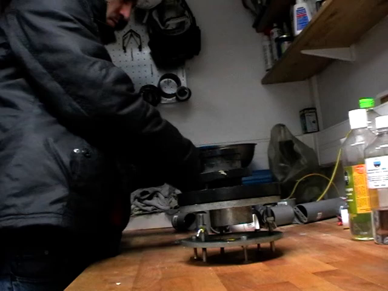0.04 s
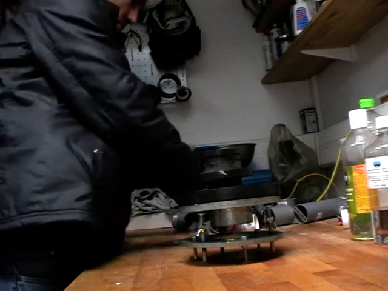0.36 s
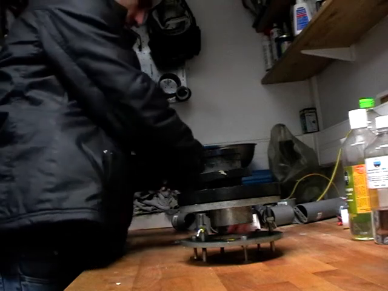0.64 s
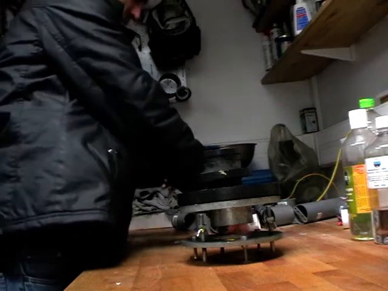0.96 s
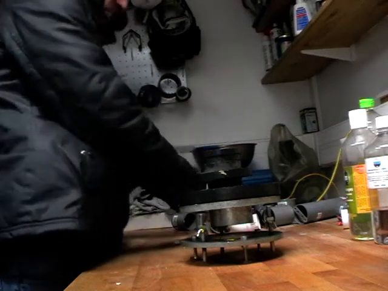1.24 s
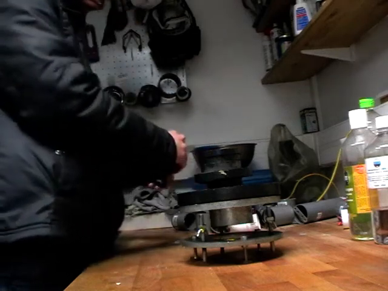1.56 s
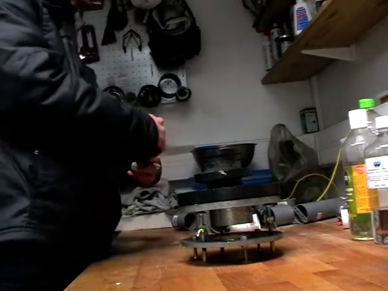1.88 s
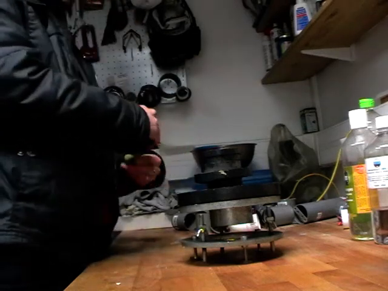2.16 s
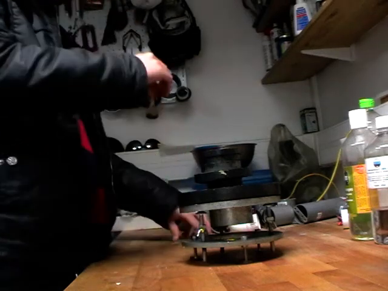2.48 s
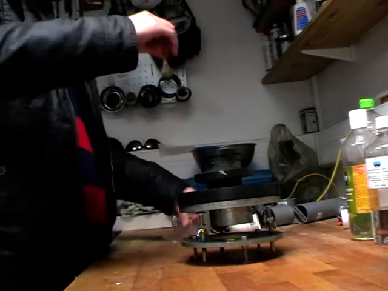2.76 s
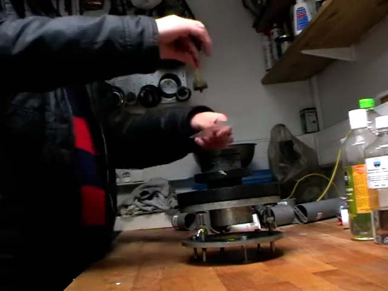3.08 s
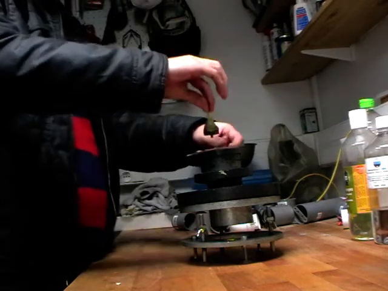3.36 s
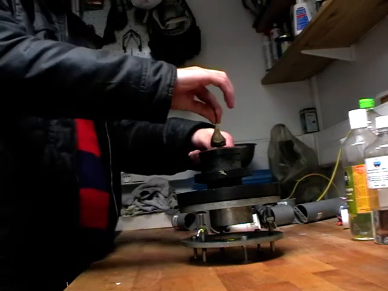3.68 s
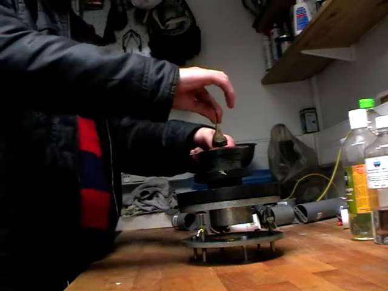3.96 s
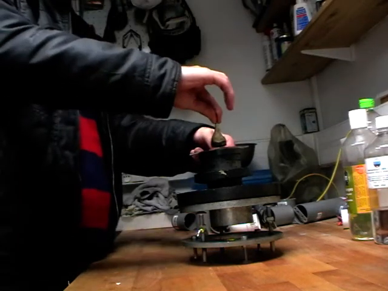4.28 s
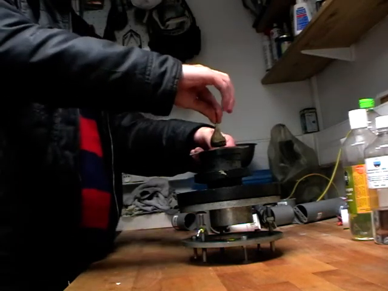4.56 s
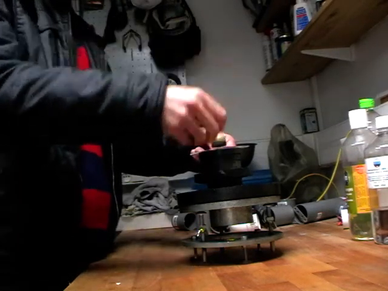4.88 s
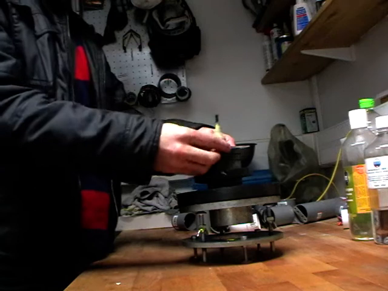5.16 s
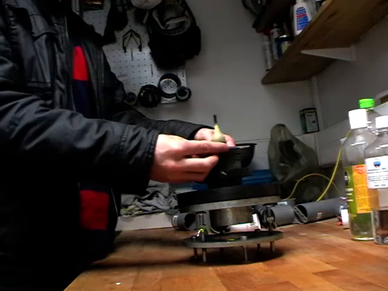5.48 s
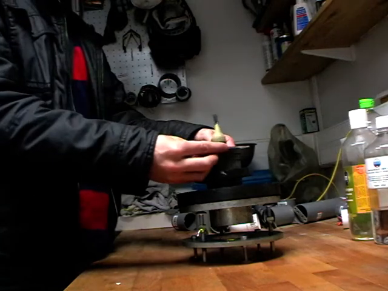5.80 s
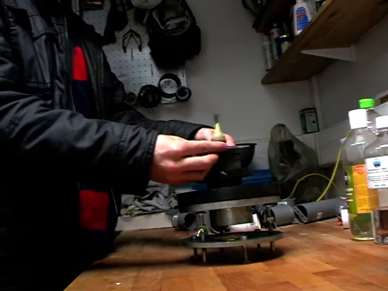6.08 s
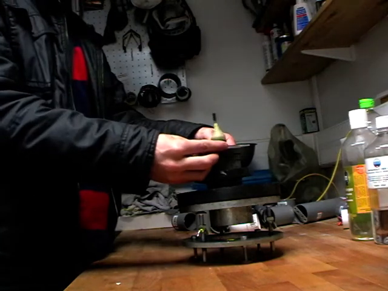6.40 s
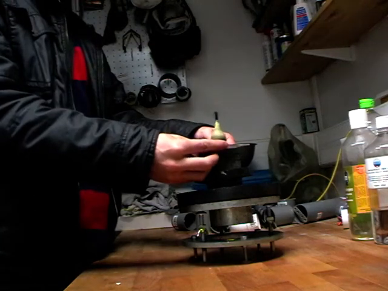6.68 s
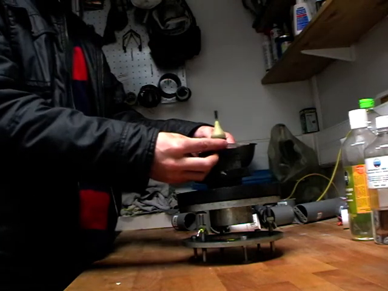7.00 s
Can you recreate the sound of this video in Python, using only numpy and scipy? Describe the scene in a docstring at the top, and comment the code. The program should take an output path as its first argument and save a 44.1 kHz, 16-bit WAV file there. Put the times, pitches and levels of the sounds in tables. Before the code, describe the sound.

Sleeve rustles and soft workbench bumps, a few sharp clacks, then the thin, steady whir of a spinning top on a plate.

```python
"""A small workshop: someone in a nylon jacket starts a magnetic spinning top on a workbench.
Sleeves swish over faint room air as threads slip; soft bumps boom in the bench top.
A lifter plate is scraped up in stick-slip strokes and clacks down over the magnet base.
The top is flicked on to the plate, hops and whirs: its tip rattles the plate's modes, pulsing once a turn,
with a few taps and squeals. As the plate is lifted, other modes grow and the bench rumble fades."""
import sys
import numpy as np
from scipy import signal
from scipy.io import wavfile

SR = 44100
rng = np.random.default_rng(int(sys.argv[2]) if len(sys.argv) > 2 else 0)


def wav_out(sig):
    """Save sig, one row per channel (or a flat mono array), as 16-bit PCM at SR to the path in sys.argv[1]."""
    wavfile.write(sys.argv[1], SR, np.round(np.clip(np.atleast_2d(sig).T, -1, 1) * 32767).astype(np.int16))


N = 310464
TIME = np.arange(N) / SR
HALF_OCTAVES_HZ = 22 * 2 ** (np.arange(20) / 2)


def from_db(db):
    """Decibels to gain."""
    return 10 ** (np.asarray(db) / 20)


def unit_rms(x):
    """Scale to rms 1."""
    return x / np.sqrt(np.mean(x ** 2) + 1e-20)


def at_hz(curve, hz):
    """Read a curve on a log-frequency axis."""
    points_hz, values = np.transpose(curve)
    return np.interp(np.log(hz), np.log(points_hz), values)


def butter(x, hz, kind, order=2):
    """Butterworth filter."""
    sos = signal.butter(order, np.clip(hz, 10, .45 * SR), kind, fs=SR, output="sos")
    return signal.sosfilt(sos, x)


def pan(x, left_db):
    """Stereo placement; left_db is left minus right."""
    return x * from_db(np.array([[left_db], [-left_db]]) / 2)


def add(out, start_s, sound):
    """Mix a sound in at start_s."""
    at = int(start_s * SR)
    out[..., at:at + sound.shape[-1]] += sound[..., :N - at]


def swell(t, rise_s, fall_s):
    """Lopsided Gaussian peaking at t = 0."""
    return np.exp(-.5 * (t / np.where(t < 0, rise_s, fall_s)) ** 2)


def step(at_s, width_s):
    """Smooth step from 0 to 1."""
    return .5 + .5 * np.tanh((TIME - at_s) / width_s)


def drift(rate_hz):
    """Slow random wander, rms 1."""
    hop, warmup = 40, 2000
    pole = np.exp(-2 * np.pi * rate_hz * hop / SR)
    noise = rng.standard_normal(N // hop + warmup + 2)
    slow = signal.lfilter([1], [1, -2 * pole, pole * pole], noise)[warmup:]
    return np.interp(np.arange(N) / hop, np.arange(len(slow)), unit_rms(slow))


def grains(per_s, spread_db):
    """Friction: tiny slips of uneven size at random moments, rms 1."""
    sizes = from_db(spread_db * np.minimum(rng.exponential(1, N), 4)) * rng.choice([-1, 1], N)
    return unit_rms(sizes * (rng.random(N) < per_s / SR))


def coloured(draw, spectrum, correlation, balance, flicker_db):
    """Shape a random source in flickering half-octave stereo bands, rms 1."""
    sources = [(draw(), draw()) for _ in range(2)]
    out = 0
    for k, band in enumerate(zip(HALF_OCTAVES_HZ, HALF_OCTAVES_HZ[1:])):
        hz = np.sqrt(band[0] * band[1])
        if hz < spectrum[0][0]:
            continue
        mid, side = butter(sources[k % 2], band, "band", order=3)
        alike = np.clip(at_hz(correlation, hz), 0, .995)
        pair = np.sqrt(1 + alike) * mid + np.sqrt(1 - alike) * side * [[1], [-1]]
        gain = from_db(at_hz(spectrum, hz) + flicker_db * drift(rate_hz=8.6))
        out = out + gain * pan(pair, at_hz(balance, hz))
    return unit_rms(out)


def resonate(force, modes, ring=1):
    """Parallel modes of alternating sign; ring divides their widths."""
    out = 0
    for k, (hz, width_hz, db) in enumerate(modes):
        r = np.exp(-np.pi * width_hz / ring / SR)
        poles = [1, -2 * r * np.cos(2 * np.pi * hz / SR), r * r]
        gain = (-1) ** k * from_db(db) * (1 - r * r) / 2
        out = out + gain * signal.lfilter([1, 0, -1], poles, force)
    return out


def touched(modes, spread_db):
    """Each contact spot favours other modes."""
    return np.array(modes) + np.outer(rng.normal(0, spread_db, len(modes)), [0, 0, 1])


def blow(modes, bands_hz, levels_db, attack_s, chatter_s, chatter, ring):
    """A contact and its dying micro-bounces ring a body; levels_db is each band's rms over attack_s."""
    t = TIME[:SR // 2]
    bounces = rng.standard_normal(len(t)) * np.exp(-t / chatter_s)
    force = chatter * unit_rms(bounces) / np.sqrt(len(t))
    force[0] += 1
    body = resonate(force + 1e-18, modes, ring)
    parts = [butter(body, band, "band", order=3) for band in bands_hz]
    return sum(from_db(db) * part / np.std(part[t < attack_s]) for part, db in zip(parts, levels_db))


def workshop(x, wet_db, width, gap_s=.0036):
    """Add the dense reflections of a small cluttered room."""
    # reverberation: f/Hz, T60/s
    t60 = [(100, .2), (1000, .21), (3000, .23), (7000, .21), (14000, .16)]
    t = TIME[:SR // 2]
    tail = 0
    for band in zip(HALF_OCTAVES_HZ, HALF_OCTAVES_HZ[1:]):
        decay = from_db(-60 * t / at_hz(t60, band[1]))
        tail = tail + butter(rng.standard_normal((2, len(t))), band, "band") * decay
    mid, side = unit_rms(tail * (t > gap_s)) / np.sqrt(len(t))
    echoes = mid + width * side * [[1], [-1]]
    return x + from_db(wet_db) * signal.fftconvolve(x, echoes, axes=1)[:, :N]


def room_air():
    """Faint low rush of the still room."""
    # f/Hz, relative density/dB
    spectrum = [(15, -51), (25, -38.5), (82, -14), (161, -14.5), (190, -13.5), (256, -33), (285, -18.5),
                (335, -2.5), (439, -23), (545, -28.5), (754, -24), (840, -28), (3820, -36), (6000, -37.5),
                (16000, -52)]
    # f/Hz, left-right correlation
    correlation = [(60, .07), (180, 0), (550, 0), (1650, 0), (4970, .46), (15000, .42)]
    # f/Hz, left minus right/dB
    balance = [(60, -7.5), (180, -1), (550, -1), (1650, 1), (4970, -0.5), (15000, 0.5)]
    rush = coloured(lambda: rng.standard_normal(N), spectrum, correlation, balance, flicker_db=2.5)
    return from_db(-56) * rush


def jacket():
    """Slipping nylon threads swish; the duller folding of the cloth grows less with speed."""
    # sleeve strokes: peak t/s, level/dB, rise/s, fall/s
    strokes = [(0.1, -49.5, .06, 0.11), (0.27, -44, 0.0099, 0.025), (0.342, -55.5, 0.01, 0.032),
               (0.66, -50, 0.079, .04), (0.855, -54, 0.049, 0.037), (1.03, -44, 0.042, 0.084),
               (1.165, -49, .03, 0.057), (1.452, -42, 0.047, 0.1), (1.72, -49.5, 0.058, 0.1),
               (1.98, -58.5, 0.22, 0.24), (2.3, -55, 0.07, 0.069), (2.5, -60.5, 0.069, 0.14),
               (3.082, -45.5, 0.064, 0.084), (4.71, -57, .03, 0.025), (4.93, -54, 0.11, 0.062),
               (5.178, -52.5, 0.012, .014), (5.26, -64.5, .02, 0.023)]
    # spectra: f/Hz, relative density/dB
    nylon_spectrum = [(1470, -19), (2500, -17.5), (3690, -12), (4340, 4), (5070, 4.5), (6600, 13),
                      (8270, 10), (11800, -14), (14600, -13), (16000, -35)]
    cloth_spectrum = [(120, -38), (200, -5.5), (238, -4), (334, -0.5), (486, 2), (845, -7.5), (1970, -3.5),
                      (3870, -12), (5000, -8.5), (6500, -38), (11000, -120)]
    # f/Hz, left-right correlation
    correlation = [(60, 0.19), (180, 0.79), (550, 0.79), (1650, 0.77), (4970, 1), (15000, 0.83)]
    # f/Hz, left minus right/dB
    balance = [(60, -2), (180, -2), (550, 0), (1650, 5.5), (4970, 0.5), (15000, 0.5)]
    firm_swish_db, firm_fold_db, still_below_db = -44.5, -47, -67
    swish = np.sqrt(sum((from_db(db) * swell(TIME - peak_s, rise_s, fall_s)) ** 2
                        for peak_s, db, rise_s, fall_s in strokes))
    moving = swish / np.hypot(swish, from_db(still_below_db))
    fold = moving * from_db(firm_fold_db) * (swish / from_db(firm_swish_db)) ** .54
    threads = lambda: grains(per_s=14000, spread_db=1.5)
    nylon = coloured(threads, nylon_spectrum, correlation, balance, flicker_db=2.6)
    cloth = coloured(threads, cloth_spectrum, correlation, balance, flicker_db=2.7)
    return swish * nylon + fold * cloth


def bench_bumps():
    """Soft heavy contacts boom in the bench top; some judder unevenly, duller with each rebound."""
    # t/s, boom/dB, rattle/dB, judder length/s, ring time factor
    bumps = [(0.256, -31, -48.5, .01, 1.9), (0.33, -35.5, -55, .01, 1.8), (0.656, -34.5, -60, .075, 0.63),
             (0.928, -52.5, -77, .03, 0.21), (1.145, -33.5, -50, .055, 0.55), (2.403, -51, -74, .01, 0.74),
             (2.459, -52.5, -76, .01, 1.2), (2.517, -53.5, -76, .01, 1), (4.655, -49.5, -74, .045, 0.26),
             (5.09, -59.5, -80, .045, .6), (5.409, -56, -78, .03, 0.97)]
    # bench modes: f/Hz, width at ring=1/Hz, gain/dB
    modes = [(95, 15, -9), (189, 7, 3), (203, 16, -3), (241, 13, -1), (267, 10, 2), (295, 12, 0),
             (350, 45, -8), (420, 45, -12), (485, 35, -6), (560, 35, -5), (620, 40, -6), (700, 50, -12),
             (2000, 1500, -22), (3200, 1200, -24)]
    bands_hz = [(40, 430), (430, 850), (1100, 5000)]   # boom, knock, rattle
    rebound_loss_db = np.array([1.4, 2.3, 2])
    rebound_s, jitter, knock_re_boom_db = .0205, .1174, -4.5
    out = np.zeros(N)
    for start_s, boom_db, rattle_db, judder_s, ring in bumps:
        for k, late_s in enumerate(np.arange(0, judder_s, rebound_s)):
            slip_s = (k > 0) * rebound_s * jitter * rng.standard_normal()
            levels_db = np.array([boom_db, boom_db + knock_re_boom_db, rattle_db]) - k * rebound_loss_db
            bump = blow(modes, bands_hz, levels_db, attack_s=.025, chatter_s=.007, chatter=.9, ring=ring)
            add(out, start_s + late_s + slip_s, bump)
    return workshop(pan(out, left_db=-4), wet_db=-18, width=2.5)


def plate_scrapes():
    """The plate's edge sticks and slips over the wood in short strokes that ring it."""
    # peak t/s, gain/dB, rise/s, fall/s, relative bass/dB
    strokes = [(0.275, -43.5, 0.0044, 0.0099, 13), (2.514, -47, 0.008, 0.021, 16),
               (2.629, -27, .011, 0.018, -7.5), (2.718, -40, 0.0022, .008, 6),
               (2.733, -31.5, .0086, 0.011, 2.5), (2.765, -40.5, 0.011, 0.02, 9),
               (2.793, -27.5, 0.0068, 0.011, -6), (2.809, -30, 0.0055, 0.0082, 1),
               (2.885, -51, 0.011, 0.027, 11)]
    # dragged plate's modes: f/Hz, width at ring=1/Hz, gain/dB
    modes = [(1894, 37, 4), (2088, 13, 5.5), (2300, 30, -4), (2604, 240, -11), (3340, 220, 2),
             (4040, 520, -2.5), (4955, 90, 2), (5380, 44, 3.5), (5970, 39, 5), (5750, 35, 3.5),
             (6460, 220, 4), (7400, 160, -2.5), (7950, 140, -4.5), (9070, 310, -6.5), (12100, 120, -12)]
    # grit: f/Hz, relative density/dB
    spectrum = [(180, -37), (300, 4), (1030, 7), (1210, 7), (2070, 11.5), (4590, -5.5), (5250, -15),
                (9240, -1), (16000, -12)]
    # f/Hz, left-right correlation
    correlation = [(60, 0.31), (240, 0.81), (950, 0.82), (3770, 0.54), (15000, 0.15)]
    # f/Hz, left minus right/dB
    balance = [(60, -4.0), (240, -0.5), (950, 2), (3770, 7.5), (15000, 0)]
    grit = coloured(lambda: grains(per_s=3000, spread_db=5), spectrum, correlation, balance, flicker_db=2)
    catches = grains(per_s=4300, spread_db=1)
    out = np.zeros((2, N))
    for peak_s, db, rise_s, fall_s, bass_db in strokes:
        near = np.abs(TIME - peak_s) < .15
        t = TIME[near] - peak_s
        ringing = unit_rms(resonate(catches[near], touched(modes, spread_db=3), ring=.6))
        slips = from_db(-7) * grit[:, near] + from_db(-1) * pan(ringing, left_db=.8)
        scrape = butter(slips, 1900, "high") - from_db(bass_db) * butter(slips, 770, "low")
        add(out, peak_s + t[0], from_db(db) * swell(t, rise_s, fall_s) * scrape)
    return workshop(out, wet_db=-14.5, width=.12)


def clack(ring_db, thud_db, knock_db, hardness_db, chatter_s):
    """One contact on the plate; a hard one snaps and sizzles above the ring."""
    # plate modes: f/Hz, width at ring=1/Hz, gain/dB
    plate_modes = [(117, 68, -12.5), (328, 500, -12.5), (592, 52, -1.5), (987, 50, 0), (1134, 66, -1.5),
                   (1230, 99, -2.5), (1436, 164, -3.5), (1990, 230, -6.5), (2162, 75, 2.5), (2540, 53, -5),
                   (2736, 244, -0.5), (2934, 200, 3.5), (3830, 280, -15.5), (3780, 170, -15.5),
                   (5010, 206, -7), (5185, 190, -9), (5780, 350, -5.5), (6420, 300, -4.5), (7200, 470, -6),
                   (8430, 1100, -12), (10900, 2400, -23)]
    snap_db = ring_db + hardness_db
    sizzle_db = ring_db - 14.5 + 2.2 * hardness_db
    bands_hz = [(80, 700), (800, 1650), (1800, 4000), (4200, 9000), (9500, 15500)]
    levels_db = [thud_db, knock_db, ring_db, snap_db, sizzle_db]
    modes = touched(plate_modes, spread_db=2)
    return blow(modes, bands_hz, levels_db, attack_s=.0045, chatter_s=chatter_s, chatter=1, ring=.68)


def plate_clacks():
    """The plate knocks on the base; the top lands and hops on the plate."""
    # t/s, ring/dB, thud/dB, knock/dB, hardness/dB
    contacts = [(3.2727, -35, -42, -37, 6), (3.329, -31, -42, -33, 3.5), (3.385, -49.5, -46, -42, 0.5),
                (3.421, -25.5, -38, -29, 1), (3.442, -30.5, -36, -33, -11.5),
                (3.575, -56.5, -73.5, -68.5, 10), (3.6017, -33, -42.5, -31, -7.5),
                (3.627, -14.5, -35, -19, -4), (3.6404, -29, -44, -31.5, -0.5),
                (3.6805, -19.5, -32, -38.5, -14.5), (3.6844, -26, -31.5, -38, -4),
                (4.6204, -45, -51.5, -46, 9), (4.6323, -25.5, -36.5, -34, -8)]
    # taps of the tip: t/s, ring/dB
    taps = [(4.312, -64), (4.68, -48), (4.719, -46), (4.801, -47.5), (5.875, -50), (6.31, -47.5),
            (6.514, -48), (6.691, -52.5), (6.871, -51.5)]
    out = np.zeros(N)
    for start_s, ring_db, thud_db, knock_db, hardness_db in contacts:
        chatter_s = .0089 * 2 ** ((-29 - ring_db) / 20)   # firmer blows settle sooner
        add(out, start_s, clack(ring_db, thud_db, knock_db, hardness_db, chatter_s))
    for start_s, db in taps:
        add(out, start_s, clack(db, thud_db=db - 23, knock_db=db - 3, hardness_db=-10, chatter_s=.0052))
    return workshop(pan(out, left_db=3), wet_db=-15, width=.39)


def tip_squeals():
    """The tip's stick-slip locks briefly on to one plate mode."""
    # peak t/s, f/Hz, peak level/dB, Gaussian sigma/s
    squeals = [(5.413, 2870, -49.5, 0.0073), (5.432, 3150, -37, 0.00078), (5.439, 3150, -44, 0.0018),
               (5.496, 2930, -46, .002), (5.517, 2845, -41.5, 0.004), (5.54, 2956, -36.5, 0.0015),
               (5.56, 2900, -50, 0.0037)]
    wander_hz = 90 * drift(rate_hz=164)
    wander_rad = 2 * np.pi * np.cumsum(wander_hz) / SR
    out = 0
    for peak_s, hz, db, sigma_s in squeals:
        envelope = from_db(db) * swell(TIME - peak_s, sigma_s, sigma_s)
        out = out + envelope * np.sin(2 * np.pi * hz * TIME + wander_rad)
    return out


def whir_gain(levels_db, lift, release_s=4.64, settle_s=.38):
    """Gain of one part of the whir: starts at release, settles, shifts with the lift."""
    down_db, up_db, wobble_db = levels_db
    unsettled = np.exp(-np.maximum(TIME - release_s, 0) / settle_s)
    return (TIME > release_s) * from_db(down_db + (up_db - down_db) * lift + wobble_db * unsettled)


def spinning_top():
    """The tip grinds on the plate, pressing harder once a turn and as the top wobbles."""
    # t/s, spin rate/Hz
    spin = [(4.63, 32.7), (5.5, 44.2), (7.04, 39)]
    # modes of plate, tip and bench: f/Hz, width at ring=1/Hz, gain/dB
    resting_modes = [(1254, 57, 5.5), (1450, 360, -8), (1931, 42, 2.5), (2603, 110, -0.5), (2913, 96, 6),
                     (3336, 27, -0.5), (3560, 71, -2.5), (4380, 44, -2)]
    lifted_modes = [(2180, 60, 0), (2380, 120, -14)]
    bending_modes = [(995, 75, 0), (1130, 70, -9)]
    tip_modes = [(4730, 250, -16), (5120, 110, 3.5), (5200, 480, -1), (5750, 94, 6.5), (6200, 570, 1),
                 (7400, 140, -17), (8940, 190, -9), (9740, 2000, -18)]
    fast_tip_modes = [(6300, 670, 0.5), (7290, 120, 6), (7220, 250, 1), (8230, 1400, -9)]
    bench_modes = [(121.2, 11, 9.5), (255, 87, -11), (330, 67, 0.5), (557, 18, 1)]
    # part levels: plate down/dB, plate up/dB, offset in the first wobble/dB
    resting_db = (-61.5, -61.5, 11.5)
    lifted_db = (-67, -59, -1)
    bending_db = (-75.5, -60.5, 18)
    hiss_db = (-61, -60.5, 7)
    rumble_db = (-65.5, -77, 16.5)
    lift = step(at_s=5.56, width_s=.07)   # plate leaves the base
    free = step(at_s=5.77, width_s=.15)   # held clear, free to bend
    fast = 1 - step(at_s=6.3, width_s=.22)   # high-speed hiss sinks as the top slows

    turns = np.cumsum(np.interp(TIME, *np.transpose(spin))) / SR
    turn_db, wobble_db = 3, 1.6
    pressure = from_db(turn_db * np.cos(2 * np.pi * turns) + wobble_db * drift(rate_hz=19))
    force = pressure * grains(per_s=4000, spread_db=6)
    fine_force = np.sqrt(pressure) * grains(per_s=15000, spread_db=9)

    resting = unit_rms(butter(resonate(force, resting_modes), 1240, "high"))
    plate = (whir_gain(resting_db, lift) * resting
             + whir_gain(lifted_db, lift) * unit_rms(resonate(force, lifted_modes))
             + whir_gain(bending_db, free) * unit_rms(resonate(force, bending_modes))
             + tip_squeals())

    fast_force = pressure * grains(per_s=8500, spread_db=5)
    hiss = unit_rms(resonate(fine_force, tip_modes))
    hiss += fast * unit_rms(resonate(fast_force, fast_tip_modes, ring=.9))
    tip = whir_gain(hiss_db, lift) * butter(hiss, 3500, "high") / np.sqrt(1 + fast ** 2)

    bench = whir_gain(rumble_db, lift) * unit_rms(butter(resonate(force, bench_modes), 970, "low"))
    whir = pan(plate, left_db=4.5) + pan(tip, left_db=-.5) + pan(bench, left_db=-2.5)
    return workshop(whir, wet_db=-11, width=.21)


def scene():
    """Stereo sum of all sources."""
    return room_air() + jacket() + bench_bumps() + plate_scrapes() + plate_clacks() + spinning_top()


def record(dry):
    """A moment of silence at the start; steep cut of the highest treble."""
    start_s, cutoff_hz = .077, 15900
    lowpass = signal.ellip(10, .2, 80, cutoff_hz, fs=SR, output="sos")
    return signal.sosfilt(lowpass, dry * (TIME > start_s))


dry = scene()
out = record(dry)
wav_out(out)
```